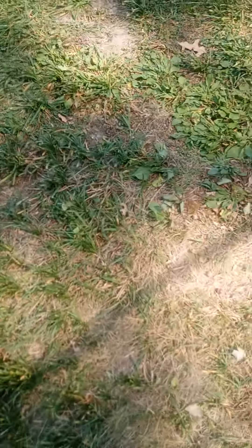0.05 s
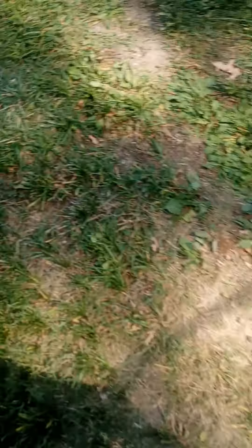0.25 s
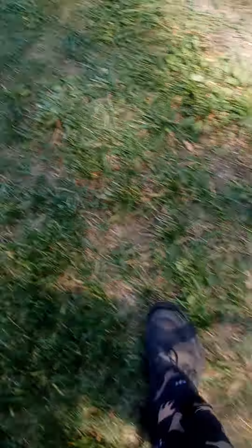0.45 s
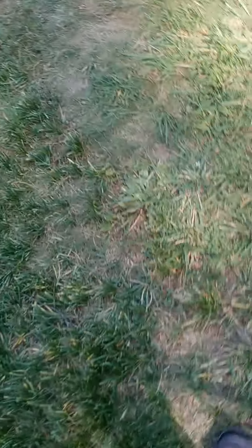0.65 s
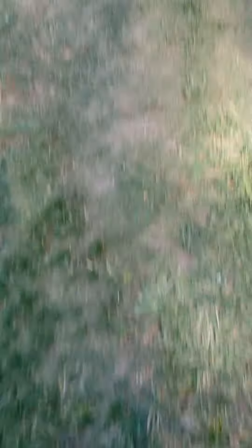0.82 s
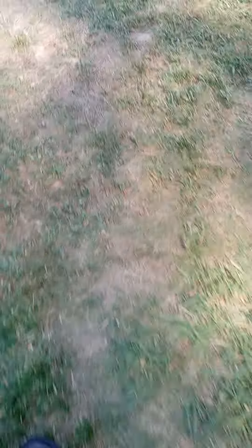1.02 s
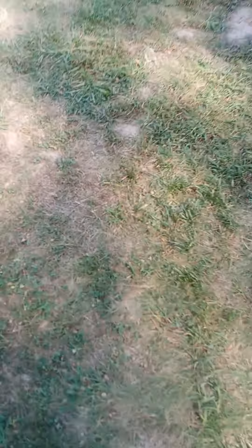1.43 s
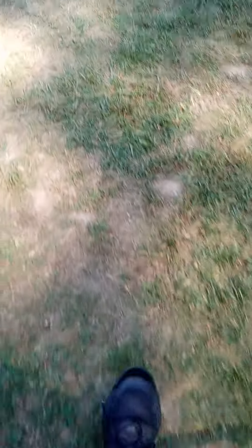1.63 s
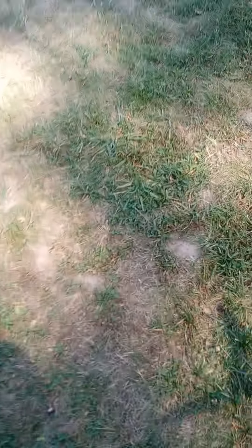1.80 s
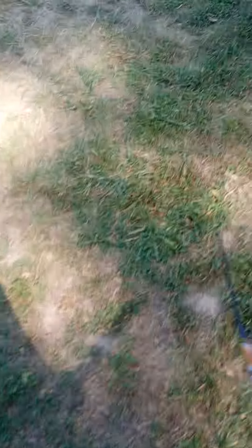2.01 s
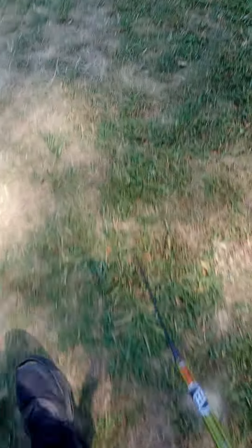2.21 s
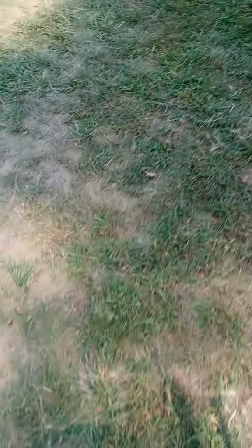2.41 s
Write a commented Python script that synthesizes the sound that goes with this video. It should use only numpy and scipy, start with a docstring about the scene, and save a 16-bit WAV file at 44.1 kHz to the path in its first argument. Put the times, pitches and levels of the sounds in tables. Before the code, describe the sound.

One sharp stick smack on a lawn, amid dry grass rustle and buffeting wind.

```python
"""Wind buffets the microphone and shoes scuff through dry grass; then, close by, a thin stick smacks
the lawn once, bounces and drags on. The impact excites the damped modes of stick and turf and
overloads the input. Friction makes blades rustle, stalks snap and a sole squeak, while turbulent
pressure gives the rumble and thumps. Far off a small bird chirps over a faint hiss of insects."""
import sys
import numpy as np
from scipy import signal
from scipy.fft import rfft, irfft
from scipy.io import wavfile
from scipy.ndimage import uniform_filter1d

SR = 44100
rng = np.random.default_rng(int(sys.argv[2]) if len(sys.argv) > 2 else 0)


def wav_record(signal):
    """Record a signal, one row per channel, as 16-bit PCM in the file named by sys.argv[1]."""
    frames = np.transpose(np.atleast_2d(signal))
    bounded = np.clip(frames, -1, 1)
    # unit amplitude maps onto the largest positive 16-bit level
    quanta = np.round(bounded * 32767).astype(np.int16)
    wavfile.write(sys.argv[1], SR, quanta)


N = 112454
TIME = np.arange(N) / SR
CUTOFF_HZ = 16000

# impact and bounces: t/s, level/dB, level of crushed blades/dB
BLOWS = [(0.481, 1.5, -17), (0.5008, -25, -51), (0.5097, -18.5, -36), (0.5190, -37, -50)]
# modes of stick and turf: f/Hz, level/dB, T60/s
STICK_MODES = [(1040, -9.5, .005), (1877, -1.5, 0.0052), (2834, -10, 0.0081), (3490, -26, 0.02),
               (4060, -25.5, 0.01), (4700, -35, 0.012), (6050, -12, .012)]
# spectra of crushed blades and settling turf: f/Hz, relative level/dB
CRUSH_SPECTRUM = [(300, -26), (700, -15.5), (1800, -5.5), (2800, -3), (3150, -19), (3500, 11), (4300, -1.5),
                  (4700, 13), (5200, 2.5), (6000, 0.5), (7100, 8), (8000, -15.5), (10300, -19.5),
                  (12800, -13.5), (15600, -1.5)]
SETTLE_SPECTRUM = [(200, -9), (600, -1.5), (1200, -3), (2000, 1.5), (3500, -10), (6200, -5), (8500, -29.5),
                   (13000, -22), (15500, -46)]
def stick(contact_hz=5000, rise_s=.0011):
    """Impact excitation: each blow rings damped modes, crushes blades and leaves the turf settling."""
    impulses, crush, settle = np.zeros((3, N))
    for s, db, crush_db in BLOWS:
        impulses[int(s * SR)] += from_db(db)
        crush += from_db(crush_db) * swell(s + .0012, rise_s, fall_s=.0012)
        settle += from_db(db - 29) * swell(s, rise_s, fall_s=.01)
    force = signal.sosfilt(butter(1, contact_hz), impulses)
    modes = sum((-1) ** k * from_db(db) * ring(force, hz, t60)
                for k, (hz, db, t60) in enumerate(STICK_MODES))
    port = from_db(-19) * ring(impulses, hz=15930, t60=.0092)  # the microphone opening rings too
    blades = crush * evened(noise(CRUSH_SPECTRUM), samples=40)
    turf = settle * evened(noise(SETTLE_SPECTRUM), samples=200)
    return modes + port + blades + turf


# envelopes of blade tips (treble), stems (middle) and dry thatch (low): t/s, level/dB
TIP_LEVEL = [(0, -69), (.085, -57.5), (.14, -70), (.31, -69.5), (.37, -63.5), (.435, -51), (.47, -58.5),
             (.54, -56), (.549, -53), (.575, -46), (.635, -51.5), (.68, -59.5), (.81, -59), (.87, -50.5),
             (.94, -54), (1.0, -48.5), (1.07, -54), (1.1, -60), (1.14, -60), (1.19, -74), (1.66, -69.5),
             (1.73, -65.5), (1.79, -69.5), (2.32, -76), (2.46, -62), (2.55, -71.5)]
STEM_LEVEL = [(0, -76), (.08, -74), (.2, -76.5), (.34, -75.5), (.42, -71), (.53, -63.5), (.585, -55),
              (.64, -55.5), (.7, -68), (.81, -64), (.88, -71), (.97, -67), (1.06, -56), (1.13, -71),
              (1.19, -76.5), (2.55, -77)]
THATCH_LEVEL = [(0, -70), (.07, -67), (.2, -79), (.33, -77), (.42, -56.5), (.47, -62), (.54, -65),
                (.59, -49), (.64, -61), (.73, -67.5), (.87, -69.5), (.98, -56), (1.06, -60), (1.14, -67),
                (1.19, -80.5), (1.6, -76), (1.69, -60.5), (1.76, -69), (1.89, -72.5), (2.0, -80.5),
                (2.3, -82.5), (2.46, -72.5), (2.55, -79.5)]
# their spectra: f/Hz, relative level/dB
TIP_SPECTRUM = [(3000, -38), (4100, -5.5), (4700, 1), (5200, -0.5), (5900, 2), (6750, -1.5), (7500, -14),
                (9400, -26), (13000, -34), (15200, -16)]
STEM_SPECTRUM = [(1500, -34), (2400, -5), (2750, -1.5), (3100, -0.5), (3500, 0.5), (4200, -16.5),
                 (5500, -20), (9000, -41)]
THATCH_SPECTRUM = [(300, -40), (600, -22), (900, -7.5), (1150, -12.5), (1600, 1.5), (2000, 4.5),
                   (2400, -15.5), (3200, -21.5), (6000, -43.5)]
def grass():
    """Comb filtering: the swish interferes with its ground echo, whose path varies as the stick moves."""
    swish = rustle(TIP_LEVEL, TIP_SPECTRUM)
    swish += rustle(STEM_LEVEL, STEM_SPECTRUM)
    swish += rustle(THATCH_LEVEL, THATCH_SPECTRUM)
    delay_s = .00104 * np.exp(.19 * drift(rate_hz=2.5))
    echo = from_db(-7.5) * np.interp(TIME - delay_s, TIME, swish)
    return swish + echo


def rustle(envelope, spectrum, grains_per_s=4000, grain_share=.55):
    """Shot noise: tiny random clicks share the power with a smooth swish."""
    level_db, = in_time(envelope)
    size_db = 5 * np.minimum(rng.exponential(1, N), 4)
    sizes = from_db(size_db) * rng.choice([-1, 1], N)
    grains = coloured(sizes * (rng.random(N) < grains_per_s / SR), spectrum)
    mix = np.sqrt(grain_share) * grains + np.sqrt(1 - grain_share) * noise(spectrum)
    return from_db(level_db) * mix


# breaking stalks: t/s, level/dB, centre f/Hz, bandwidth/Hz, decay time/s
SNAPS = [(.0715, -48, 5000, 3990, 0.00074), (.151, -52.5, 2130, 1800, 0.0033),
         (.569, -35, 5470, 2970, 0.00086), (.584, -36, 4630, 3880, 0.0026),
         (.7635, -38, 4400, 3570, 0.00086), (.799, -36.5, 3770, 2180, 0.0016),
         (1.0655, -36.5, 5740, 2200, 0.0011), (1.118, -27.5, 5370, 3333, 0.0013),
         (1.675, -67.5, 5960, 8860, .001), (1.706, -48.5, 5000, 4440, 0.0021),
         (1.735, -50, 6150, 1700, .002), (1.7875, -36.5, 1730, 580, 0.0012)]
def stalks():
    """Brittle fracture: each stalk gives way in an abrupt burst of noise."""
    return bursts(SNAPS, rise_s=.0004)


# shoes on turf: t/s, level/dB, centre f/Hz, bandwidth/Hz, decay time/s
SCUFFS = [(.051, -48.5, 3800, 3240, 0.0098), (.548, -49, 1200, 1010, 0.0062),
          (.547, -49.5, 5840, 1800, 0.0054), (.756, -43.5, 3900, 3320, 0.014),
          (1.121, -46, 2000, 1470, 0.0078), (1.331, -56, 3230, 1290, 0.0058),
          (1.643, -41, 465, 300, 0.0064), (1.647, -58.5, 1730, 599, 0.015), (1.707, -45.5, 436, 480, 0.012),
          (1.712, -57, 1990, 1800, 0.0086), (1.942, -61.5, 4550, 1410, 0.012)]
def shoes():
    """Sliding friction: each scuff is a burst of noise with a softer onset."""
    return bursts(SCUFFS, rise_s=.003)


# course of the squeak: t/s, f/Hz, level/dB
SQUEAK = [(.242, 740, -70), (.247, 755, -37), (.253, 938, -40), (.261, 868, -35.5), (.266, 755, -67)]
# its partials: harmonic number, relative level/dB
SQUEAK_PARTIALS = [(1, -9.5), (2, -16), (3, -16.5), (5, -25), (7, -21)]
def squeak(jitter=.055):
    """Stick-slip oscillation: a sole grips and slides unevenly, giving a brief rough tone."""
    hz, db = in_time(SQUEAK)
    phase = phase_of(hz * (1 + jitter * drift(rate_hz=350)))
    tone = sum(from_db(partial_db) * np.sin(k * phase) for k, partial_db in SQUEAK_PARTIALS)
    return from_db(db) * tone


# envelope of the rumble: t/s, level/dB
WIND_LEVEL = [(0, -42.5), (.15, -42), (.2, -54), (.24, -40.5), (.3, -55.5), (.35, -41), (.42, -58.5),
              (.455, -34), (.52, -67.5), (.63, -38.5), (.67, -51), (.78, -52.5), (.83, -38.5), (.89, -46.5),
              (.94, -37), (1.0, -63.5), (1.055, -67), (1.085, -26.5), (1.15, -44.5), (1.23, -36),
              (1.31, -56.5), (1.42, -29.5), (1.48, -46), (1.53, -37), (1.59, -62), (1.64, -42.5),
              (1.76, -43.5), (1.825, -43), (1.86, -66), (1.99, -58), (2.1, -65), (2.18, -58.5),
              (2.32, -67.5), (2.55, -65.5)]
# spectra of rumble and flutter: f/Hz, relative level/dB
RUMBLE_SPECTRUM = [(20, -40.5), (45, -7.5), (80, 5.5), (130, 3.5), (200, -11), (300, -27), (500, -34),
                   (900, -84.5)]
FLUTTER_SPECTRUM = [(80, -14.5), (170, 6.5), (260, -1.5), (360, -13.5), (520, -26.5), (900, -67.5)]
# strong eddies: t/s, peak level/dB, bandwidth/Hz
EDDIES = [(0.0829, -29, 99), (0.1358, -25, 139), (.161, -26, 127), (0.3294, -19, 133), (0.626, -37.5, 82),
          (0.6963, -33, 83), (0.828, -26.5, 109.8), (0.8581, -16.5, 130), (0.9195, -32.5, 97),
          (1.0854, -24.5, 112), (1.0986, -20, 190), (1.139, -23.5, 120), (1.1625, -16, 143),
          (1.2, -27, 163), (1.2917, -26, 78.7), (1.334, -28.5, 108), (1.3607, -19, 197), (1.4124, -23, 332),
          (1.4238, -26.5, 96.8), (1.4431, -27, 108.4), (1.456, -30.5, 87), (1.529, -33.5, 146.7),
          (1.8278, -27.5, 102), (1.987, -47.5, 54), (2.17, -46.5, 57), (2.242, -46, 110)]
def wind(strong_db=-35, flutter_growth=1.31):
    """Turbulence at the microphone: flutter grows faster than rumble, and single eddies thump."""
    db, = in_time(WIND_LEVEL)
    rumble = from_db(db) * evened(noise(RUMBLE_SPECTRUM), samples=700)
    flutter = from_db(-44.5 + flutter_growth * (db - strong_db)) * noise(FLUTTER_SPECTRUM)
    thumps = sum(from_db(peak_db) * eddy(s, hz) for s, peak_db, hz in EDDIES)
    return rumble + flutter + thumps


def eddy(s, width_hz, low_hz=85, high_hz=508, rebound_hz=55):
    """Low pressure in a vortex: a band-limited dip at time s and its rebound; peak 1."""
    t = np.arange(-SR // 20, SR // 20) / SR
    dip = -1 / np.cosh(2 * np.pi * width_hz * t)
    dip = signal.sosfiltfilt(butter(2, low_hz, "high"), dip)
    dip = signal.sosfilt(butter(1, rebound_hz, "high"), dip)
    dip = signal.sosfiltfilt(butter(3, high_hz), dip)
    return np.interp(TIME - s, t, dip / np.abs(dip).max(), left=0, right=0)


def hoot():
    """Flow excitation: one gust across the microphone opening sounds a narrow band."""
    return burst(s=1.212, db=-30.5, hz=252, width_hz=89, fall_s=.0084, rise_s=.0084)


# calls of a far bird: t/s, level/dB, f/Hz at the peak
CHIRPS = [(.15, -56.5, 4870), (.19, -63, 4800), (0.229, -59, 4800), (0.304, -63, 4570), (1.46, -59, 4850),
          (1.512, -54, 4770), (1.777, -57, 4730), (1.821, -54.5, 4830), (2.07, -67.5, 4750),
          (2.28, -70, 4650), (2.33, -65, 4860), (2.43, -59.5, 4780)]
def bird(half_length_s=.015, sag_hz_per_s=4100, warble_hz=46):
    """Frequency modulation: each chirp is a falling, warbling sine under a Gaussian envelope."""
    out = np.zeros(N)
    warble = warble_hz * drift(rate_hz=220)
    for s, db, hz in CHIRPS:
        pitch = hz - sag_hz_per_s * (TIME - s) + warble
        envelope = np.exp(-((TIME - s) / half_length_s) ** 2)
        out += from_db(db) * envelope * np.sin(phase_of(pitch))
    return out


# still air over the field: f/Hz, relative level/dB
AIR_SPECTRUM = [(30, 9), (90, 0), (200, 6.5), (500, -1.5), (1200, -1.5), (1900, -15.5), (3000, -19),
                (4100, -17.5), (4700, 5), (5100, -57), (5600, 6.5), (6100, -74), (6900, -13), (7400, -46),
                (9200, -19), (13300, -31.5), (14500, -6.5), (15800, -7)]
def air():
    """Stationary noise: the quiet ambient floor of the field."""
    return from_db(-66) * noise(AIR_SPECTRUM)


# hiss of distant insects: f/Hz, relative level/dB
INSECT_SPECTRUM = [(7000, -38), (7650, -3.5), (7950, 4.5), (8250, 4), (8620, 12.5), (8950, -12.5),
                   (9400, -65)]
# their two notes: f/Hz, level/dB
INSECT_NOTES = [(7980, -72.5), (8590, -77.5)]
# swell of the higher note: t/s, gain/dB
INSECT_SWELL = [(0, -9.5), (1.5, -14.5), (1.8, 6), (2.2, 6), (2.55, 3.5)]
def insects(hiss_throb_db=5, note_throb_db=1, waver_hz=91.2):
    """Random modulation: a band of hiss and two wavering notes throb, the higher note swelling."""
    out = from_db(-75 + hiss_throb_db * drift(rate_hz=25)) * noise(INSECT_SPECTRUM)
    for (hz, db), swell_db in zip(INSECT_NOTES, [0, *in_time(INSECT_SWELL)]):
        phase = phase_of(hz + waver_hz * drift(rate_hz=127.4))
        out += from_db(db + swell_db + note_throb_db * drift(rate_hz=42)) * np.sin(phase)
    return out


def from_db(db):
    """Amplitude ratio of a level in decibels."""
    return 10 ** (np.asarray(db) / 20)


def rms_one(x):
    """Normalisation to unit rms."""
    return x / np.sqrt(np.mean(x ** 2) + 1e-20)


def phase_of(hz):
    """Phase as the time integral of frequency."""
    return 2 * np.pi * np.cumsum(hz) / SR


def butter(order, hz, kind="low"):
    """Maximally flat filter, in second-order sections."""
    return signal.butter(order, hz, kind, fs=SR, output="sos")


def in_time(rows):
    """Linear interpolation of each column at every sample."""
    s, *columns = np.transpose(rows)
    return [np.interp(TIME, s, column) for column in columns]


def coloured(x, spectrum):
    """Spectral shaping along a logarithmic frequency axis; rms 1."""
    hz, db = np.transpose(spectrum)
    bin_hz = np.maximum(np.arange(N // 2 + 1) * SR / N, 1)
    gain = from_db(np.interp(np.log(bin_hz), np.log(hz), db))
    return rms_one(irfft(rfft(x) * gain, N))


def noise(spectrum):
    """Gaussian noise of a given spectral shape; rms 1."""
    return coloured(rng.standard_normal(N), spectrum)


def evened(x, samples):
    """Envelope flattening: division by the running rms."""
    return x / np.sqrt(np.abs(uniform_filter1d(x ** 2, samples)) + 1e-12)


def drift(rate_hz):
    """Random fluctuation: low-passed noise; rms 1."""
    return rms_one(signal.sosfilt(butter(2, rate_hz), rng.standard_normal(N)))


def swell(s, rise_s, fall_s):
    """Exponential growth to 1 at time s, then exponential decay."""
    return np.exp(-np.maximum((s - TIME) / rise_s, (TIME - s) / fall_s).clip(0, 40))


def ring(force, hz, t60):
    """Damped oscillator: a unit impulse starts a decaying sine of amplitude 1."""
    radius = np.exp(-np.log(1000) / (t60 * SR))
    angle = 2 * np.pi * hz / SR
    return signal.lfilter([0, np.sin(angle)], [1, -2 * radius * np.cos(angle), radius ** 2], force + 1e-18)


def burst(s, db, hz, width_hz, fall_s, rise_s):
    """Transient excitation: a pulse of noise rings in one band."""
    low_hz = np.hypot(hz, width_hz / 2) - width_hz / 2
    band = butter(4, [low_hz, min(low_hz + width_hz, CUTOFF_HZ)], "band")
    envelope = swell(s, rise_s, fall_s)
    pulse = signal.sosfilt(band, envelope * rng.standard_normal(N))
    return from_db(db) * np.sqrt(np.mean(envelope ** 2)) * rms_one(pulse)


def bursts(rows, rise_s):
    """Superposition of one burst for each row."""
    return sum(burst(*row, rise_s) for row in rows)


def scene():
    """Superposition: all sources add at one microphone in the open."""
    near = stick() + grass() + stalks() + shoes() + squeak() + wind() + hoot()
    far = bird() + air() + insects()
    return (near + far)[None]


def record(dry, ceiling=.39, hardness=4, low_cut_hz=23.7):
    """Saturation and band limiting: the smack overloads the input; deepest bass and top are cut."""
    clipped = dry / (1 + np.abs(dry / ceiling) ** hardness) ** (1 / hardness)
    trimmed = signal.sosfiltfilt(butter(2, low_cut_hz, "high"), clipped)
    return signal.sosfilt(signal.cheby2(16, 60, CUTOFF_HZ + 600, fs=SR, output="sos"), trimmed)


dry = scene()
out = record(dry)
wav_record(out)
```